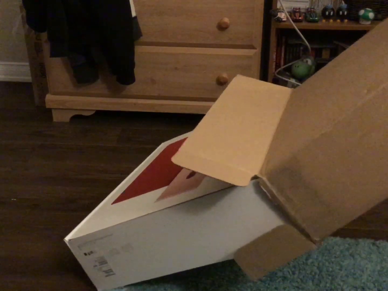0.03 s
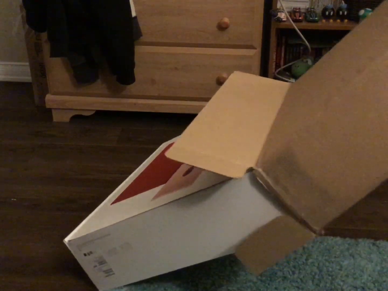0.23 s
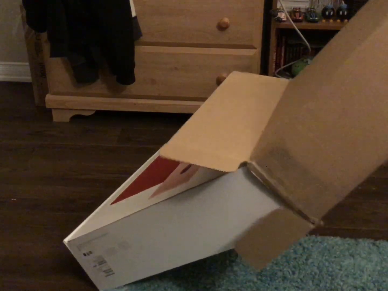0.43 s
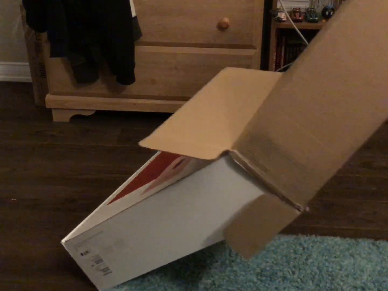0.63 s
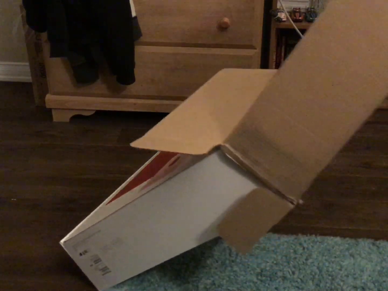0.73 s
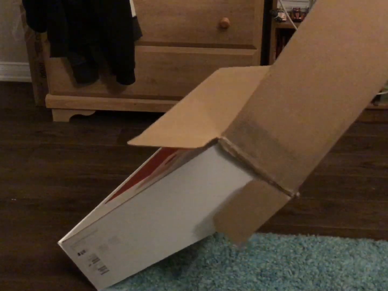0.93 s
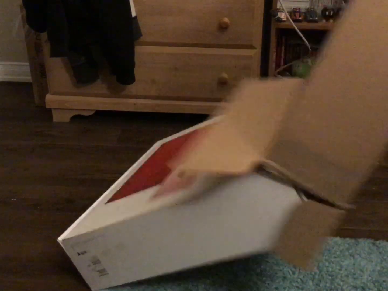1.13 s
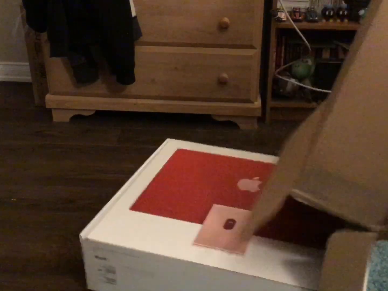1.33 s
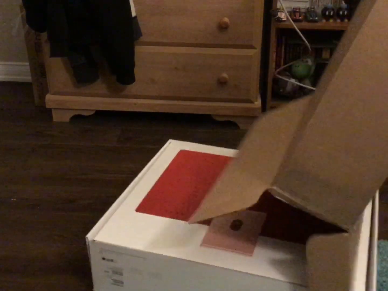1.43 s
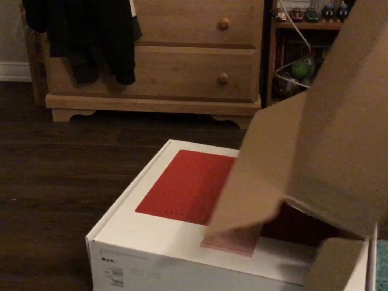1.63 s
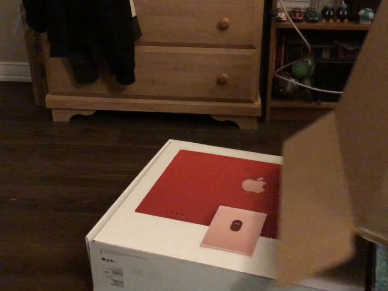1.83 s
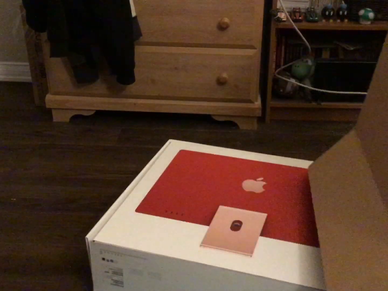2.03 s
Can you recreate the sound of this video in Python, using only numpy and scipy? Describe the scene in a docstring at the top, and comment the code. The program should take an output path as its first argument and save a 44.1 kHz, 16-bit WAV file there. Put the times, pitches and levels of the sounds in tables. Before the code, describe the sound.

Heavy box thud on an indoor floor, after cardboard rubbing and a short groan, then soft bumps

```python
"""A heavy boxed item slides out of a tilted shipping carton: card rubs and scrapes by friction, as many tiny
slips filtered to the card's spectrum. The carton's panels rumble as low filtered noise and groan at a rubbed
resonance. The box slams on the floor: contact noise plus decaying low modes, loud enough to overload the
microphone. The carton takes soft bumps during the slide and after the landing, and the empty carton brushes and
booms as it is lifted off. A furnished room adds its reverberation, and quiet room air lies beneath."""
import sys
import numpy as np
from scipy import signal
from scipy.fft import rfft, irfft
from scipy.io import wavfile
from scipy.ndimage import uniform_filter1d

SR = 44100
rng = np.random.default_rng(int(sys.argv[2]) if len(sys.argv) > 2 else 0)


def dump_mix(stems):
    """Bounce the given channels to the path in sys.argv[1] as a 16-bit WAV at rate SR."""
    frames = np.atleast_2d(stems).T  # one column per channel
    limited = np.clip(frames, -1, 1)  # hard clip at full scale
    pcm = np.round(limited * 32767).astype(np.int16)
    wavfile.write(sys.argv[1], SR, pcm)


N = 92565
TIME = np.arange(N) / SR

# Spectra are relative densities; friction, panel noise and air are normalised before their level is set.
# Strokes of card on card:
# (start [s], length [s], level [dB], attack [s], release [s], tilt [dB per octave])
RUB_STROKES = [(-.03, 0.23, -55.5, 0.027, 0.022, -2.5), (.04, 0.088, -53.5, 0.046, 0.041, 0.5),
               (.194, 0.037, -33.5, 0.011, 0.044, 0), (.22, 0.14, -44, 0.0071, 0.13, -1.9),
               (.375, .17, -50.5, 0.056, 0.069, -1), (.52, 0.18, -58, .03, 0.04, -2),
               (.63, 0.19, -50.5, 0.13, 0.043, -1), (.80, 0.11, -51, 0.054, 0.042, -4),
               (.87, 0.22, -47, 0.057, 0.12, -0.5), (1.04, 0.23, -42, 0.082, .07, -3),
               (1.22, 0.19, -47, 0.067, 0.0058, -1.2), (1.336, 0.029, -33.5, 0.0043, 0.0042, -3.5),
               (1.42, 0.12, -61.5, 0.034, 0.032, 1.5), (1.52, 0.18, -58.5, 0.046, 0.078, 0),
               (1.762, 0.083, -59, 0.0036, 0.022, 1), (1.885, 0.068, -63, 0.037, .02, -2.5),
               (2.003, 0.088, -59.5, 0.01, 0.057, 5.3)]
# Spectrum of rubbing card: (frequency [Hz], density [dB per Hz])
RUB_SPECTRUM = [(250, -3.5), (560, -3), (680, 1.5), (820, -0.5), (1050, -3.5), (1250, 0), (1800, -0.5),
                (2800, -1), (4400, -2.5), (6400, -5), (7900, -8), (10500, -6), (11800, -7), (13500, -17),
                (16000, -17)]
RUB_SLIPS_PER_S, RUB_SPREAD_DB = 6000, 1.5
JUDDER_RMS_DB, JUDDER_HZ = 0.64, 70
# The box's rear edge dragging over the flap, and the loose flaps dragging over the box:
# (start [s], length [s], level [dB], attack [s], release [s], tilt [dB per octave])
FLAP_SCRAPES = [(.198, 0.067, -41.5, 0.0034, 0.093, 2), (.41, 0.13, -55.5, 0.021, 0.067, -5),
                (.96, .13, -50, 0.037, 0.018, 0), (1.085, 0.087, -35.5, 0.025, 0.021, -2.5),
                (1.155, 0.064, -36, .015, 0.039, 1), (1.19, 0.1, -39, 0.018, 0.013, -6.5),
                (1.66, .19, -59.5, 0.01, 0.03, 0.5), (2.003, 0.079, -54, .018, 0.043, 4)]
# Spectrum of the scraped flap: (frequency [Hz], density [dB per Hz])
FLAP_SPECTRUM = [(150, -38), (330, -20.5), (425, 2.5), (540, -9.5), (720, 1), (860, -4.5), (1040, -4.5),
                 (1230, -2), (1450, -11), (2600, -12.5), (4000, -29.5), (9000, -41), (15000, -68)]
FLAP_SLIPS_PER_S, FLAP_SPREAD_DB = 1500, 1.5
PATCH_RMS_DB = 2.2
# Edges of card that sing briefly as they flick past each other:
# (time [s], level [dB], pitch [Hz], width [Hz])
EDGE_FLICKS = [(.2, -49, 5750, 900), (.2, -49, 1910, 120), (2.005, -59, 1570, 110)]
FLICK_LENGTH_S, FLICK_ATTACK_S, FLICK_RELEASE_S = 0.072, 0.0021, 0.028

# The box landing, edge first and then flat:
# (time [s], slap level [dB], boom level [dB], tilt [dB per octave])
LANDING_BLOWS = [(1.3427, 13, -21.5, -2), (1.3458, 12, 1, 1.5), (1.3545, 6, -1.4, 1.5),
                 (1.3605, -5, -23, 4), (1.3680, 9, -43, -3.5), (1.3785, -12, -15.5, -7.5)]
# Modes of the box on the floor: (frequency [Hz], relative level [dB], T60 [s])
BOX_MODES = [(62.7, -7, .36), (81.8, -6.5, 0.23), (88.2, 6, 0.086), (129.1, 2.5, 0.09),
             (145.5, -2.5, 0.192), (195.3, -2, .22), (230.1, -18.5, 0.29), (256.1, -5, 0.11),
             (350, -14, 0.098), (443, -30, 0.15), (696, -25.5, 0.15), (809, -29, 0.13)]
# Spectrum of the landing slap: (frequency [Hz], density [dB per Hz])
SLAP_SPECTRUM = [(60, -12.5), (300, -4), (680, -1), (1000, 3.5), (1260, 1), (1600, -1), (1950, -6),
                 (2700, -10.5), (3400, -14), (4200, -22), (7500, -28), (11000, -35), (15500, -49)]
SLAP_RISE_S, SLAP_T60_S = 0.00061, 0.021
# Soft bumps on the carton: (time [s], tap level [dB], hollow level [dB], tilt [dB per octave])
CARTON_BUMPS = [(.605, -20, -75, 2.5), (.617, -23, -72, 0.5), (1.886, -15.5, -45, 8),
                (1.895, -22.5, -31.5, 6.5), (1.914, -16.5, -25, 2.5), (1.947, -38, -28.5, -8),
                (1.973, -52, -48, -8)]
# Modes of the hollow carton: (frequency [Hz], relative level [dB], T60 [s])
CARTON_MODES = [(60, -19, 0.28), (79.8, -3, 0.25), (130.6, -9.5, 0.32), (172.7, 6, 0.077),
                (232.4, -15, 0.24), (293, -36, 0.17), (530, -31, 0.076)]
# Spectrum of a tap on the carton: (frequency [Hz], density [dB per Hz])
TAP_SPECTRUM = [(100, -11.5), (300, 5.5), (480, 0.5), (800, -9.5), (1100, -18.5), (1600, -36), (4000, -56),
                (12000, -69)]
TAP_RISE_S, TAP_T60_S = 0.0054, 0.036
MODE_RISE_S = 0.0033  # time constant, like the two rises above

# Course of the panels' low rumble: (time [s], level [dB])
PANEL_LEVEL = [(0, -46.5), (.15, -45), (.19, -53), (.22, -36.5), (.36, -51), (.43, -45.5), (.52, -42),
               (.6, -57), (.82, -56.5), (.88, -47.5), (.97, -46), (1.11, -33.5), (1.3, -38.5), (1.5, -39),
               (1.59, -51), (1.72, -45.5), (1.82, -55.5), (2.02, -46.5), (2.1, -58)]
# Spectrum of the shaking panels: (frequency [Hz], density [dB per Hz])
PANEL_SPECTRUM = [(20, -41), (34, -18), (48, -3.5), (68, -17.5), (90, 6), (115, -2), (185, 0.5),
                  (225, -5.5), (280, -7.5), (330, -28.5), (600, -32.5), (1500, -81)]
# Groan of the carton as the box drags out: (time [s], pitch [Hz], level [dB])
GROAN_PATH = [(0.851, 180, -59), (1.0, 174.6, -49.5), (1.091, 172, -34.5), (1.155, 171.2, -31.5),
              (1.192, 168, -33), (1.249, 227.2, -27), (1.285, 209, -27), (1.32, 210, -35),
              (1.359, 196, -27)]
GROAN_WIDTH_HZ = 69
# The emptied carton booms softely as it swings free:
# (start [s], length [s], level [dB], attack [s], release [s])
SWING_STROKE = (1.565, .2, -43.5, .02, .07)
SWING_HZ, SWING_WAVER_RMS_HZ, SWING_WAVER_RMS_DB = 78, 2.5, 1.2

# Reverberation time of the room: (frequency [Hz], T60 [s])
ROOM_DECAY = [(60, 0.51), (250, 0.37), (1000, 0.32), (3000, 0.27), (7000, .26), (15000, 0.12)]
ROOM_DELAY_S = 0.0036
RUB_WET_DB, HIT_WET_DB, BOOM_WET_DB = -10.5, -7, -21.5
# Spectrum of the room air: (frequency [Hz], density [dB per Hz])
AIR_SPECTRUM = [(20, -33), (35, -5), (60, 10.5), (200, -2), (400, -7.5), (1500, -15), (4000, -24),
                (11000, -27.5), (16000, -34)]
AIR_DB = -56
CEILING, KNEE = 1, 5  # microphone's peak amplitude, and exponent for how sharply it is reached
EDGE_HZ = 15800  # upper band limit


def friction(strokes, spectrum, slips_per_s, spread_db):
    """Sliding friction: random tiny slips of uneven size, juddering, excite the card in each stroke."""
    excess_db = spread_db * np.minimum(rng.exponential(1, N), 4)
    sizes = amp(excess_db) * rng.choice([-1, 1], N)
    happens = rng.random(N) < slips_per_s / SR
    slips = sizes * happens * amp(JUDDER_RMS_DB * wander(JUDDER_HZ))
    return sum(envelope(*shape) * unit(colour(slips, spectrum, tilt)) for *shape, tilt in strokes)


def patchy(x):
    """Moving contact: as the contact patch shifts, narrow resonances of the card come and go."""
    z = signal.stft(x, SR, nperseg=512)[2]
    patches = uniform_filter1d(rng.standard_normal(z.shape), size=3, axis=0)  # across frequency
    patches = uniform_filter1d(patches, size=10, axis=1)  # across time
    return signal.istft(z * amp(PATCH_RMS_DB * unit(patches)), SR, nperseg=512)[1][:N]


def flicks():
    """Edge resonance: a card edge, briefly excited, rings in a narrow fuzzy band."""
    total = np.zeros(N)
    for s, db, hz, width in EDGE_FLICKS:
        shape = envelope(s, FLICK_LENGTH_S, db, FLICK_ATTACK_S, FLICK_RELEASE_S)
        total += shape * resonance(hz, width)
    return total


def resonance(hz, width):
    """Narrow-band noise: a randomly modulated carrier follows a pitch, steadier than plain noise."""
    drive = wander(width / 2) + 1j * wander(width / 2)
    turn = np.exp(2j * np.pi * np.cumsum(hz * np.ones(N)) / SR)
    steadied = drive / np.sqrt(abs(drive) + 1e-9)  # square root of the magnitude, same phase
    return unit((turn * steadied).real)


def blows(table, modes, spectrum, rise, t60):
    """Impact: each blow is a short burst of crushing card plus the low modes of the struck body."""
    t = np.arange(SR // 2) / SR
    contact, body = np.zeros(N), np.zeros(N)
    for s, contact_db, body_db, tilt in table:
        burst = rng.standard_normal(len(t)) * (1 - np.exp(-t / rise)) * amp(-60 * t / t60)
        crush = unit(colour(burst, spectrum, tilt)) / np.sqrt(len(t))  # unit energy
        add(contact, s, amp(contact_db) * crush)
        add(body, s, amp(body_db) * ring(modes, t))
    return room(contact, HIT_WET_DB) + room(body, BOOM_WET_DB)


def ring(modes, t):
    """Modal superposition: a struck box sounds as a sum of exponentially decaying sinusoids."""
    total = sum(amp(db - 60 * t / t60) * np.sin(2 * np.pi * hz * t) for hz, db, t60 in modes)
    return (1 - np.exp(-t / MODE_RISE_S)) * total


def rumble():
    """Panel vibration: large panels shake at random, groan as the box drags out, and boom once empty."""
    level_db = np.interp(TIME, *np.transpose(PANEL_LEVEL))
    shake = amp(level_db) * unit(colour(rng.standard_normal(N), PANEL_SPECTRUM))
    return shake + groan() + swing()


def groan():
    """Rubbed resonance: a fuzzy tone follows the tabled pitch and is silent outside its span."""
    s, hz, db = np.transpose(GROAN_PATH)
    level = amp(np.interp(TIME, s, db, -np.inf, -np.inf))
    return level * resonance(np.interp(TIME, s, hz), GROAN_WIDTH_HZ)


def swing():
    """Low resonance of the empty carton: a sine wavering in both pitch and level."""
    turns = np.cumsum(SWING_HZ + SWING_WAVER_RMS_HZ * wander(8.3)) / SR
    waver = amp(SWING_WAVER_RMS_DB * wander(32))
    return envelope(*SWING_STROKE) * waver * unit(np.sin(2 * np.pi * turns))


def room(x, wet_db, size=22050):
    """Reverberation: a delayed dense noise tail whose bands decay at their own rates joins the sound."""
    hz, t, z = signal.stft(rng.standard_normal(size), SR, nperseg=256)
    decay = amp(-60 * t / read(ROOM_DECAY, hz)[:, None])
    tail = signal.istft(z * decay, SR, nperseg=256)[1]
    out = x.copy()
    add(out, ROOM_DELAY_S, amp(wet_db) * signal.fftconvolve(x, tail / np.linalg.norm(tail))[:N])
    return out


def room_air():
    """Stationary background noise: steady random pressure with the spectrum of the room air."""
    return amp(AIR_DB) * unit(colour(rng.standard_normal(N), AIR_SPECTRUM))


def envelope(start, length, db, attack, release):
    """Amplitude envelope: linear attack and release, whichever is lower, at most full level."""
    rising, falling = (TIME - start) / attack, (start + length - TIME) / release
    return amp(db) * np.clip(np.minimum(rising, falling), 0, 1)


def colour(x, spectrum, tilt=0, size=8192):
    """Minimum-phase filtering: the log gain fixes a causal response; tilt in dB per octave re 1 kHz."""
    hz = abs(np.fft.fftfreq(size, 1 / SR))
    octaves = np.log2(np.maximum(hz, 200) / 1000)  # the tilt is held below 200 Hz
    log_gain = np.log(amp(read(spectrum, hz) + tilt * octaves))
    taps = np.fft.ifft(np.exp(np.conj(signal.hilbert(log_gain)))).real[:size // 2]
    return signal.fftconvolve(x, taps)[:len(x)]


def wander(hz):
    """Low-passed noise: random motion of rms 1 whose spectrum is halved at the given rate."""
    lowpass = 1 / (1 + (np.fft.rfftfreq(N, 1 / SR) / hz) ** 4)
    return unit(irfft(rfft(rng.standard_normal(N)) * lowpass, N))


def read(points, hz):
    """Interpolation of a table along a logarithmic frequency axis."""
    f, value = np.transpose(points)
    return np.interp(np.log(hz + 1), np.log(f + 1), value)


def add(mix, s, sound):
    """Superposition: adds a sound to the mix in place from time s."""
    part = mix[max(round(s * SR), 0):][:len(sound)]
    part += sound[:len(part)]


def amp(db):
    """Amplitude ratio of a level in decibels."""
    return 10 ** (np.asarray(db) / 20)


def unit(x):
    """Normalisation to a root-mean-square value of 1."""
    return x / np.sqrt(np.mean(x ** 2) + 1e-20)


def scene():
    """Superposition of rubbing, scraping, landing, bumps and rumble over quiet room air."""
    rub = friction(RUB_STROKES, RUB_SPECTRUM, RUB_SLIPS_PER_S, RUB_SPREAD_DB)
    scrape = friction(FLAP_SCRAPES, FLAP_SPECTRUM, FLAP_SLIPS_PER_S, FLAP_SPREAD_DB)
    sliding = room(patchy(rub + scrape) + flicks(), RUB_WET_DB)
    landing = blows(LANDING_BLOWS, BOX_MODES, SLAP_SPECTRUM, SLAP_RISE_S, SLAP_T60_S)
    bumps = blows(CARTON_BUMPS, CARTON_MODES, TAP_SPECTRUM, TAP_RISE_S, TAP_T60_S)
    return (sliding + landing + bumps + rumble() + room_air())[None]


def record(dry):
    """Saturation and band limiting: the microphone flattens the thud's peaks, then the treble is cut."""
    squashed = dry / (1 + abs(dry / CEILING) ** KNEE) ** (1 / KNEE)
    lowpass = signal.firwin(511, EDGE_HZ, window=("kaiser", 9), fs=SR)
    return signal.oaconvolve(squashed, lowpass[None], "same")


dry = scene()
out = record(dry)
dump_mix(out)
```